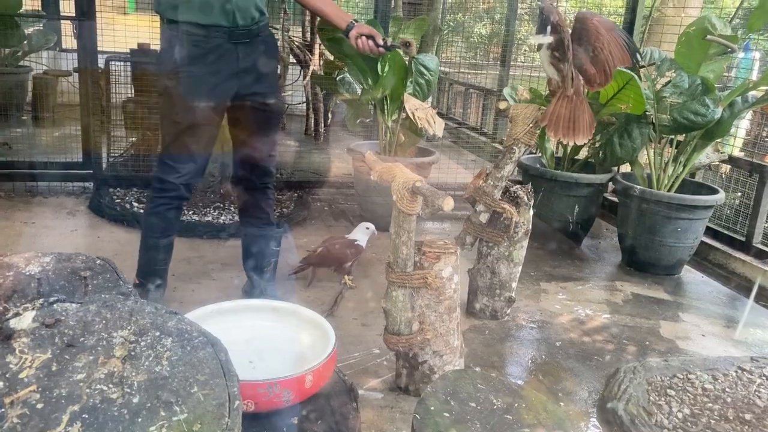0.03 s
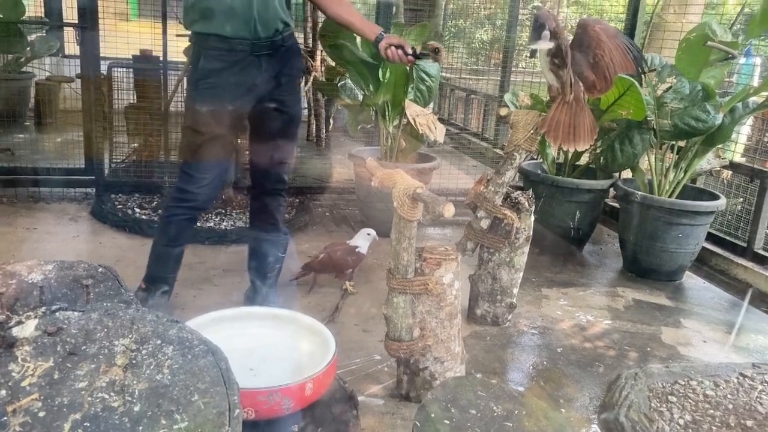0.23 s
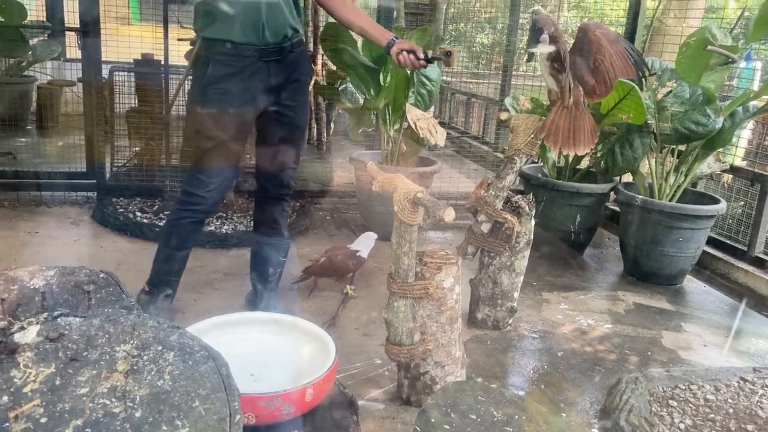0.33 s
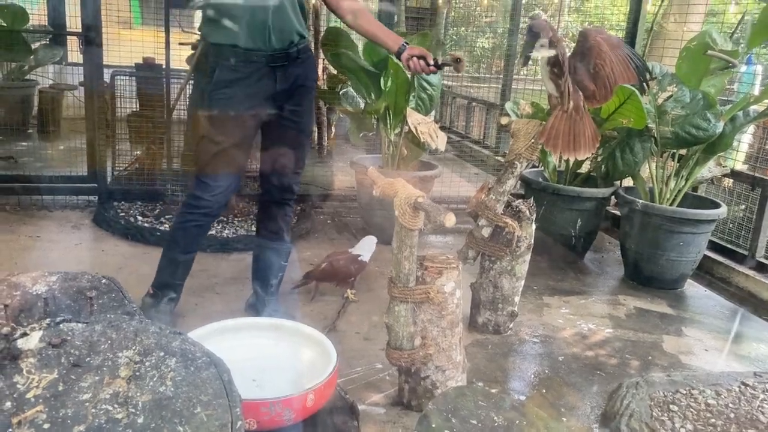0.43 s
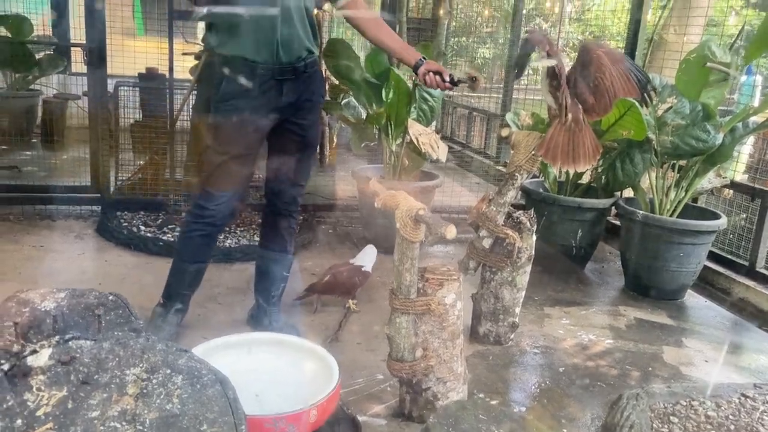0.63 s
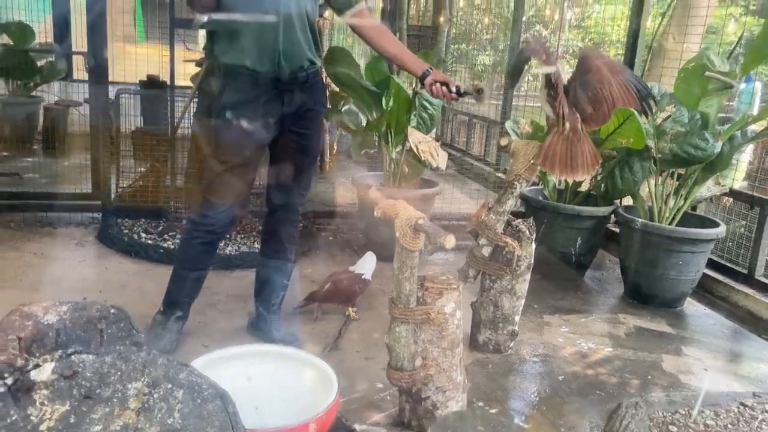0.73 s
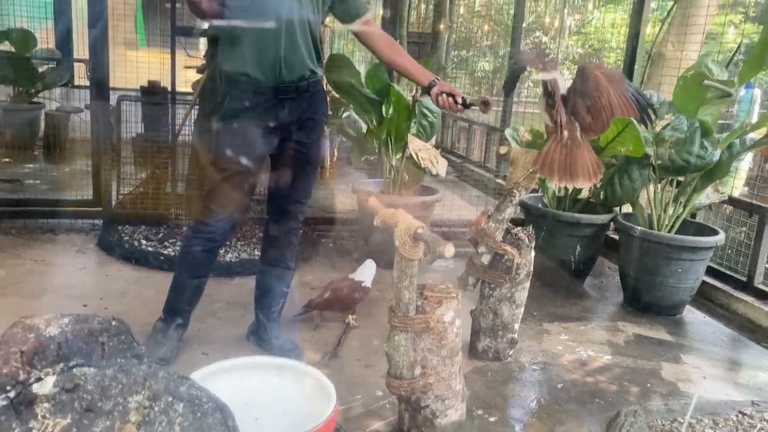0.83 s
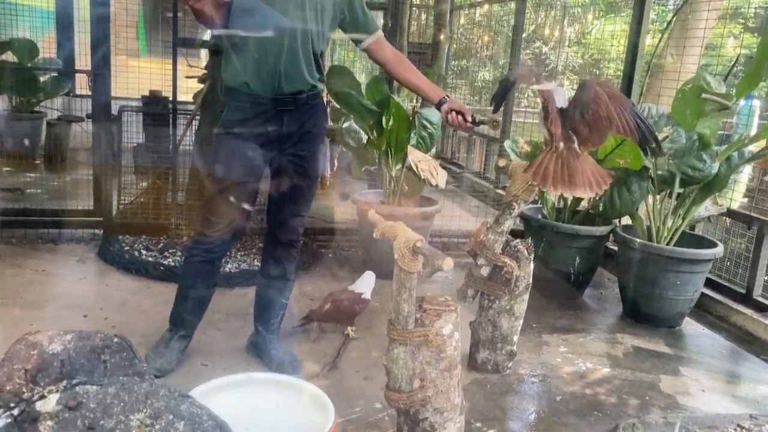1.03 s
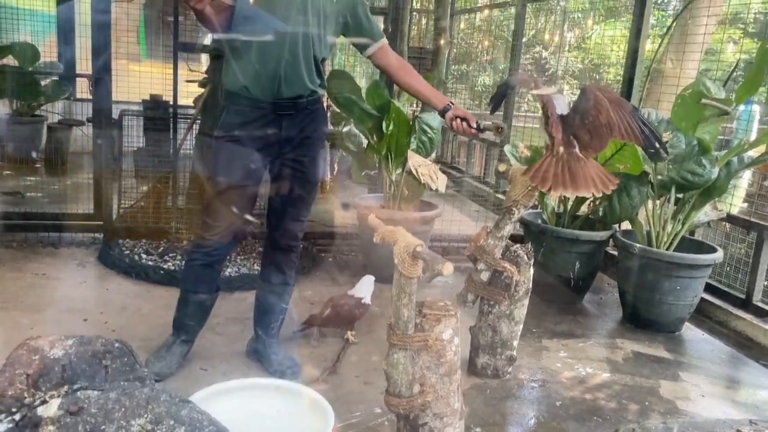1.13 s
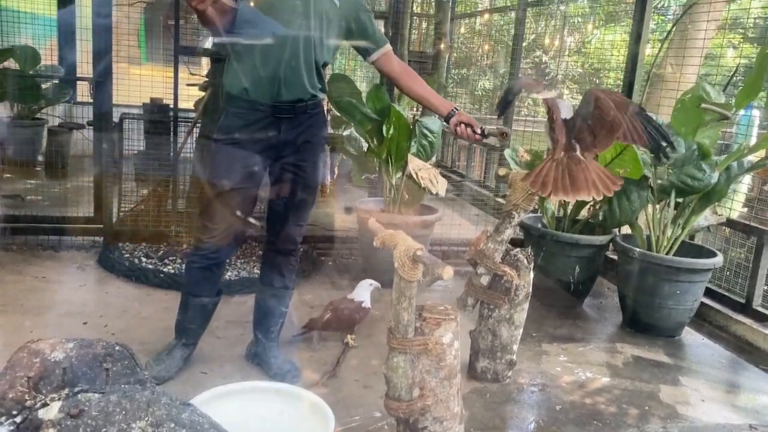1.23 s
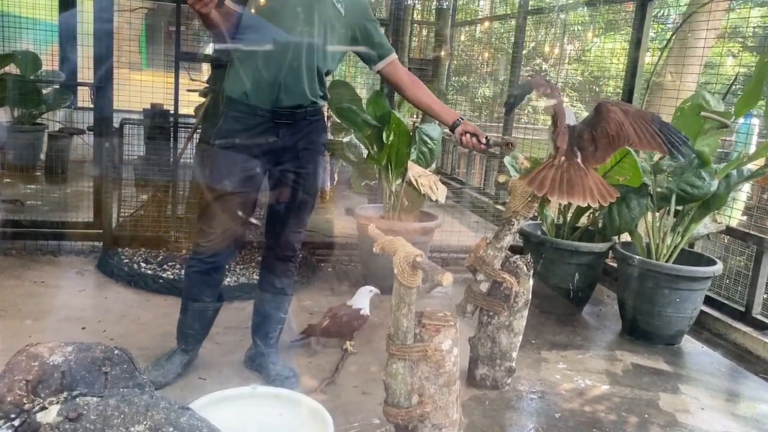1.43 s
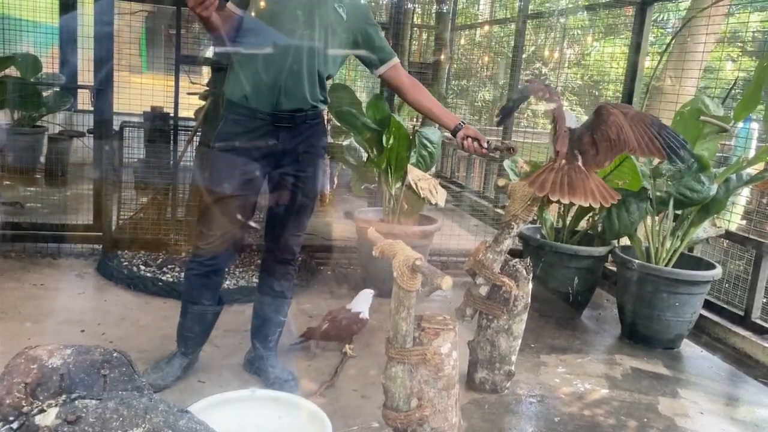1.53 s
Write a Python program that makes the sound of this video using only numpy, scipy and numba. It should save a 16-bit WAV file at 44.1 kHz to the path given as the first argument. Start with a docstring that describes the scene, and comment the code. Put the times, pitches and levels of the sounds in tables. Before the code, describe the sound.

A bird of prey's single mewing cry dominates: it starts raspy at about 0.22 s, rises, breaks into a piercing, overloaded whistle around 0.6-0.8 s, then falls and stops near 1.0 s, leaving a short hard-surfaced echo. Throughout, a low engine throbs under a broad rush. A water-like hiss swells from 0.15 s, bright feathery rustling flutters at 0.2-0.9 s, and a tiny distant peep comes at 1.35 s.

```python
"""A kite gives one long mewing cry in a hard-floored aviary, loud enough to overload the phone that hears it.
A small engine idles nearby, a broad rush fills the air and a hiss, perhaps running water, comes up early on;
a bright rustle and one far peep join in. The cry and engine are sums of partials, the peep a sine burst and
the rest coloured noise; all-pass loops and cross-fed delay lines echo the cry."""
import sys
import numpy as np
from scipy import signal
from scipy.fft import rfft, irfft
from scipy.io import wavfile
from scipy.ndimage import uniform_filter1d
from numba import njit

SR = 44100
rng = np.random.default_rng(int(sys.argv[2]) if len(sys.argv) > 2 else 0)


def to_wav(sig):
    """Store sig (one row per channel, or 1-D mono) as 16-bit WAV at the path in sys.argv[1].

    Samples outside -1..1 are clipped; the rate is SR.
    """
    pcm = np.clip(np.atleast_2d(sig), -1, 1) * 32767
    pcm = np.round(pcm).astype(np.int16)
    wavfile.write(sys.argv[1], SR, pcm.T)  # frames by channels


def natural_amplitude(level_db):
    """Convert a level in decibels to a linear amplitude factor, elementwise."""
    exponent = np.asarray(level_db, float) / 20
    return 10 ** exponent


N = 70560
TIME_S = np.arange(N) / SR


def column(table, index):
    """One column of a table, interpolated linearly over time."""
    rows = np.array(table, float)
    return np.interp(TIME_S, rows[:, 0], rows[:, index])


def log_interp(hz, points):
    """Level in dB from (Hz, dB) points, linear over log frequency."""
    rows = np.array(points, float)
    return np.interp(np.log(hz), np.log(rows[:, 0]), rows[:, 1])


def level(x, db):
    """Scale to an rms level."""
    return x * natural_amplitude(db) / np.sqrt(np.mean(x ** 2))


def walk(rate_hz):
    """Smoothed random steps, rms 1."""
    hold = int(SR / rate_hz)
    steps = np.repeat(rng.standard_normal(N // hold + 2), hold)
    smooth = uniform_filter1d(uniform_filter1d(steps, hold), hold)
    return level(smooth[:N], 0)


def coloured(points):
    """Noise shaped by (Hz, dB) points, rms 1."""
    hz = np.arange(1, N // 2 + 2) * SR / N
    spectrum = rfft(rng.standard_normal(N)) * natural_amplitude(log_interp(hz, points))
    return level(irfft(spectrum, N), 0)


def rush():
    """Steady broadband noise, strongest in the bass, wavering slightly."""
    # noise colour: f/Hz, relative density/dB
    rush_colour = [(20, -29), (45, 1), (100, -7), (250, -11), (400, -10.5), (800, -12.5), (2400, -13.5),
                   (4000, -25.5), (8000, -38), (15500, -50)]
    level_db = -27.5 + 0.23 * walk(3.34)
    return natural_amplitude(level_db) * coloured(rush_colour)


def hiss():
    """Mid-treble noise that comes up early, perhaps running water."""
    # noise colour: f/Hz, relative density/dB
    hiss_colour = [(500, -11.5), (1200, -1.5), (2400, -1.5), (4000, -10), (6000, -12.5), (9000, -19.5),
                   (15500, -33.5)]
    # rise: t/s, gain/dB
    hiss_rise = [(0, -12), (.135, -4.5), (.155, 2.5), (.21, 3.5), (.3, 6.5), (1.0, 7), (1.6, 5.5)]
    level_db = -32 + column(hiss_rise, index=1) + 0.27 * walk(11.8)
    return natural_amplitude(level_db) * coloured(hiss_colour)


def rustle():
    """Fluttering high-band noise, perhaps spread feathers."""
    # envelope: t/s, level/dB
    rustle_rise = [(.13, -70), (.155, -46), (.21, -34), (.3, -45), (.6, -38), (.9, -55)]
    peak_hz = 9376
    level_db = column(rustle_rise, index=1) + 1.35 * walk(41)
    return natural_amplitude(level_db) * coloured([(peak_hz / 3, -20), (peak_hz, 0), (16000, -8)])


def peep():
    """A far bird's peep: a sine under a Gaussian envelope."""
    centre_s, length_s, pitch_hz, peak_db = 1.348, 0.004, 2450, -19
    envelope = np.exp(-((TIME_S - centre_s) / length_s) ** 2)
    return natural_amplitude(peak_db) * envelope * np.sin(2 * np.pi * pitch_hz * TIME_S)


def engine():
    """Orders of the firing rate under the exhaust colour, each wavering a little."""
    # idle: t/s, firing rate/Hz, rms level/dB
    idle = [(0, 24, -23.5), (.12, 22.5, -22.5), (.24, 19.4, -25), (.33, 18.8, -23), (.45, 18.9, -21),
            (.53, 19.1, -22), (.62, 19.3, -20), (.85, 19.65, -24), (1.6, 20.25, -22.5)]
    # exhaust colour: f/Hz, relative order level/dB
    exhaust = [(20, -9), (40, -17.5), (59, -6), (79, -1), (96, 6), (118, -8.5), (138, -10.5), (157, -3),
               (178, -22), (215, -9.5), (245, -30.5), (280, -15), (315, -19.5), (355, -14.5), (400, -27.5),
               (480, -19)]
    orders, scatter_db = 24, 1.2
    firing_at_s = 1.241  # the moment of one firing
    lag_s_per_hz = 0.15e-3  # higher orders peak later in the cycle
    rate_hz = column(idle, index=1)
    cycles = np.cumsum(rate_hz) / SR
    cycles = cycles - cycles[int(firing_at_s * SR)]
    out = 0
    for k in range(1, orders + 1):
        order_db = log_interp(k * rate_hz, exhaust) + scatter_db * walk(12)
        lag_rad = np.pi * lag_s_per_hz * (k * rate_hz[-1]) ** 2
        out = out + natural_amplitude(order_db) * np.cos(2 * np.pi * k * cycles - lag_rad)
    return level(out, 0) * natural_amplitude(column(idle, index=2))


def kite():
    """A steady fundamental and whistle; the upper partials waver under the beak resonance, with breath."""
    # cry: t/s, pitch f/Hz, fundamental level/dB, whistle (2nd partial) level/dB, rasp and breath gain/dB
    cry = [(.224, 515, -50, -20.5, -16), (.25, 530.4, -31, -24, -17.5), (.27, 542.8, -30, -30, -13),
           (.31, 569.6, -27.5, -16.5, -10.5), (.36, 578.1, -19, -25, -12), (.41, 584.3, -24.5, -10, -10),
           (.46, 586.2, -23.5, -10.5, -15.5), (.51, 590.2, -18, -14, -6), (.54, 595, -21.5, -17.5, -8),
           (.57, 611.9, -21, -3, -14), (.6, 639.4, -13.5, -3.5, -9), (.63, 645.6, -10, 6, -20.5),
           (.66, 661.4, -10, 5, -11), (.72, 662.2, -8, 7, -17), (.77, 659, -10, 8, -56),
           (.8, 644.3, -16.5, 7, -18.5), (.83, 629.4, -21.5, 3, -23.5), (.87, 610.2, -21, 0.5, -33),
           (.91, 590, -22, -6.5, -23.5), (.95, 575.5, -26, -8, -22), (.985, 501.4, -41, -9, -45)]
    # beak resonance: t/s, f/Hz
    beak = [(.224, 1900), (.27, 2080), (.3, 2620), (.36, 2570), (.44, 2730), (.48, 2400), (.53, 2450),
            (.58, 2330), (.62, 2240), (.85, 2744), (.95, 2930)]
    # higher resonances once the beak is wide: f/Hz, width/Hz, gain/dB
    sharp = [(4270, 920, -13), (6100, 890, -20)]
    partials, shimmer_db, steady_shimmer_db = 16, 2.4, 0.4
    beak_width_hz, floor_db, slope_db_per_oct = 866, -19.5, -15.5
    wide_from_s, widening_s = 0.321, 0.027
    break_s, break_len_s, break_rad = 0.6, 0.042, 1.34  # rms rad at the 4th partial
    attack_s, release_s = 0.0059, 0.013

    pitch_hz = uniform_filter1d(column(cry, index=1), size=1300)
    phase = 2 * np.pi * np.cumsum(pitch_hz) / SR
    fundamental = natural_amplitude(column(cry, index=2)) * np.sin(phase)
    whistle = natural_amplitude(column(cry, index=3)) * np.sin(2 * phase)
    tone = (fundamental + whistle) * natural_amplitude(steady_shimmer_db * walk(28.7))

    # breath pulses once per pitch cycle
    breath_noise = coloured([(300, -20), (2500, -4.5), (9000, -18.5), (16000, -42)])
    rasp = natural_amplitude(-18) * (1 + np.cos(phase)) * breath_noise

    # the rasp turns unsteady as the whistle takes over
    unsteady = np.exp(-((TIME_S - break_s) / break_len_s) ** 2) * walk(250)
    shaky = phase + break_rad / 4 * unsteady
    wide = np.clip((TIME_S - wide_from_s) / widening_s, 0, 1)
    for k in range(3, partials + 1):
        partial_hz = k * pitch_hz
        off = (partial_hz - column(beak, index=1)) / beak_width_hz
        gain = 1 / (1 + off ** 2) ** 3 + natural_amplitude(floor_db + slope_db_per_oct * np.log2(k / 4))
        for hz, width_hz, db in sharp:
            gain = gain + wide * natural_amplitude(db) / (1 + ((partial_hz - hz) / width_hz) ** 2) ** 2
        shimmer = natural_amplitude(shimmer_db * walk(55.06))
        rasp = rasp + gain * shimmer * np.sin(k * shaky - 3 * np.arctan(off))

    attack = np.clip((TIME_S - cry[0][0]) / attack_s, 0, 1)
    release = np.clip((cry[-1][0] - TIME_S) / release_s, 0, 1)
    return (tone + rasp * natural_amplitude(column(cry, index=4))) * attack * release


def scatter(x):
    """Short all-pass loops: plants, pots and perches smear the sound that feeds the echoes."""
    # loop delays: t/ms
    scatter_ms = [3.1, 5.3, 8.9]
    for ms in scatter_ms:
        taps = np.zeros(int(ms * SR / 1000) + 1)
        taps[0], taps[-1] = 1, -0.66
        x = signal.lfilter(taps[::-1], taps, x)
    return x


@njit
def walls(x, lags, gain, damp):
    """Eight delay lines that feed each other, duller on every round."""
    line, soft, out = np.zeros((8, 4096)), np.zeros(8), np.zeros(len(x))
    for i in range(len(x)):
        total = 0.
        for k in range(8):
            echo = gain[k] * line[k, (i - lags[k]) & 4095]
            soft[k] += (1 - damp) * (echo - soft[k])
            total += soft[k]
            out[i] += soft[k] * (1 - 2 * (k % 2))  # alternate signs
        for k in range(8):
            line[k, i & 4095] = x[i] + soft[k] - total / 4
    return out


def room(x):
    """Echoes between floor and glass, each path losing level by its length."""
    # paths between the surfaces: t/ms
    wall_ms = [17.3, 21.1, 26.9, 31.7, 37.9, 43.3, 49.9, 57.1]
    t60_s, damp, echo_db = 0.88, 0.13, -19  # t60 before damping
    lags = (np.array(wall_ms) * SR / 1000).astype(np.int64)
    gain = natural_amplitude(-60. * lags / SR / t60_s)
    return natural_amplitude(echo_db) * walls(scatter(x + 1e-18), lags, gain, damp)


def scene():
    """The cry and its echo off floor and glass, over engine and background."""
    background = rush() + hiss() + rustle() + peep()
    bird = kite()
    mix = bird + room(bird) + engine() + background
    return mix[None, :]


def top_cut(x):
    """Nothing passes above the cut-off."""
    return signal.sosfilt(signal.butter(12, 15460, fs=SR, output="sos"), x)


def record(dry):
    """The phone's input overloads with a short knee, then a steep low-pass cuts the top."""
    clip, knee, top_hz = 0.71, 18, 15480  # clip: full scale = 1
    fine = signal.resample_poly(dry, 4, 1, axis=1)  # oversample against aliasing
    flat = fine / (1 + np.abs(fine / clip) ** knee) ** (1 / knee)
    wet = signal.resample_poly(flat, 1, 4, axis=1)
    low_pass = signal.ellip(8, .2, 70, top_hz, fs=SR, output="sos")
    wet = signal.sosfilt(low_pass, wet)
    return top_cut(wet)


dry = scene()
out = record(dry)
to_wav(out)
```